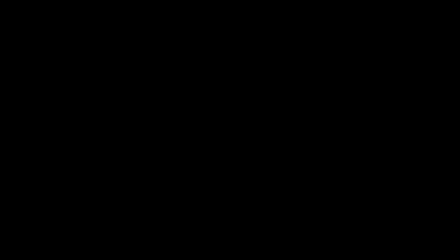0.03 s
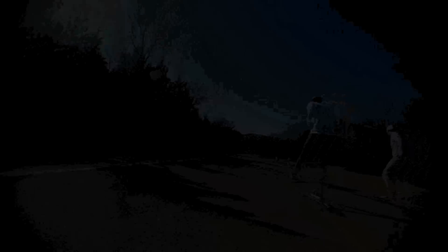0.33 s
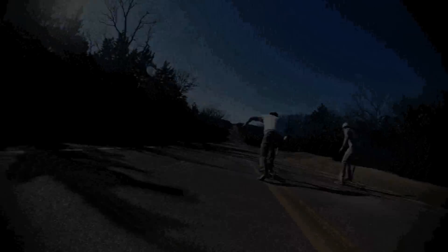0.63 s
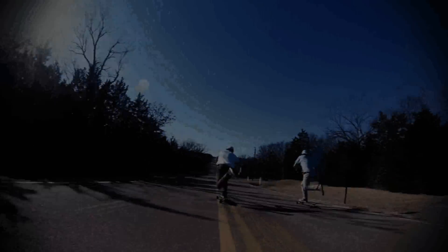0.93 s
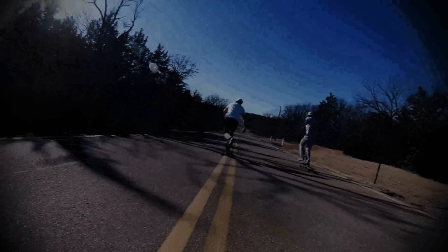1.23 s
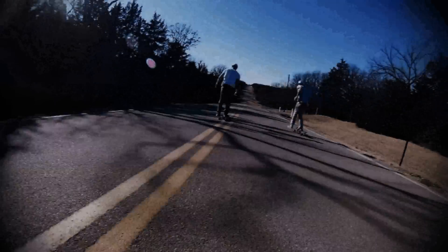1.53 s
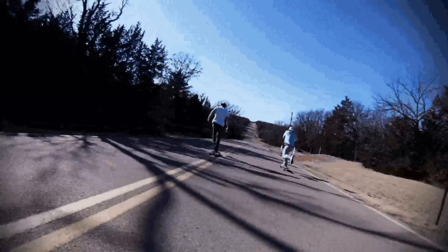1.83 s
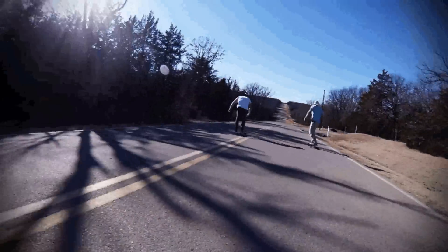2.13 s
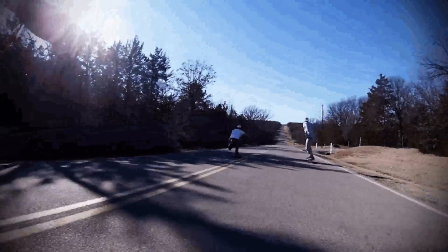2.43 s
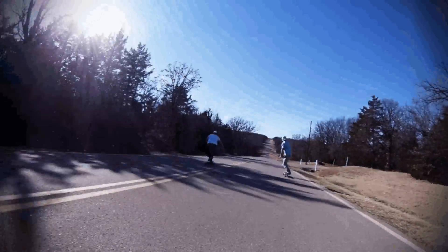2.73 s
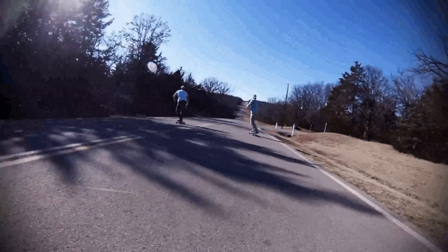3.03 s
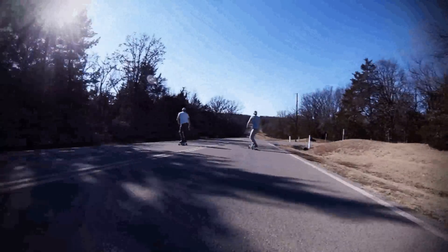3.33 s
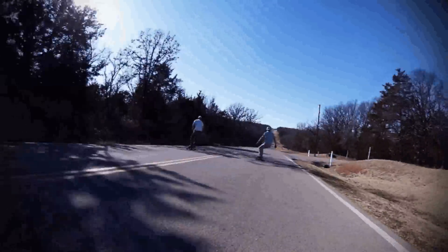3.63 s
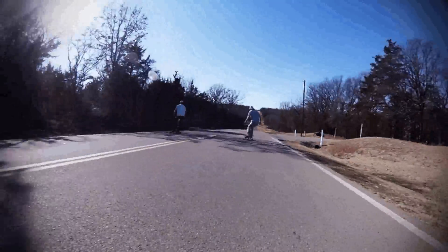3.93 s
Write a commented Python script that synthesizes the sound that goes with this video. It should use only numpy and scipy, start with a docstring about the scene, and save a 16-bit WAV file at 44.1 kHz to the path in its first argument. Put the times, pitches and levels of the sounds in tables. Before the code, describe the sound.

Longboard wheels fade in, roaring on coarse asphalt, humming and scraping in the turns. Wind increasingly buffets the microphone, which rides along in a plastic case, and a few bumps make the case knock, one very hard.

```python
"""An asphalt road, from a rolling longboard; the microphone rides along in a closed plastic camera case.
The sound fades in. The wheels roar on the coarse surface, and hum, whine and scrape in the carves.
Right at the microphone, air rushes over the case and buffets it more and more. Grit sizzles briefly.
A few bumps make the case knock; the hardest overloads the microphone."""
import sys
import numpy as np
from scipy import signal
from scipy.fft import rfft, irfft
from scipy.io import wavfile

SR = 44100
rng = np.random.default_rng(int(sys.argv[2]) if len(sys.argv) > 2 else 0)


def digitize_waveform(pressure):
    """Quantize a signal to 16-bit integers and store it at the path in sys.argv[1].

    Rows of a 2-D input are taken as channels; values are limited to [-1, 1].
    """
    field = np.atleast_2d(pressure).T
    bounded = np.clip(field, -1, 1)
    quanta = np.round(bounded * 32767).astype(np.int16)
    wavfile.write(sys.argv[1], SR, quanta)


N = 176400


def from_db(db):
    """Decibels to gain."""
    return 10 ** (np.asarray(db) / 20)


def rms_one(x):
    """Scale to rms 1."""
    return x / np.sqrt(np.mean(x ** 2) + 1e-20)


def in_time(rows):
    """Each column of a curve over time, at every sample."""
    times, *columns = np.transpose(rows)
    return [np.interp(np.arange(N) / SR, times, column) for column in columns]


def drift(rate_hz):
    """A random wander of rms about 1, mostly slower than rate_hz."""
    hop, settle = 40, 2000
    pole = np.exp(-2 * np.pi * rate_hz * hop / SR)
    noise = rng.standard_normal(N // hop + settle + 2)
    slow = signal.lfilter([1], [1, -2 * pole, pole * pole], noise)[settle:]
    return np.interp(np.arange(N) / hop, np.arange(len(slow)), rms_one(slow))


def coloured(x, colour):
    """Give a steady sound a spectrum that falls 12 dB an octave beyond its ends; rms 1."""
    hz, db = np.transpose(colour)
    f = np.maximum(np.arange(N // 2 + 1) * SR / N, 1)
    gain = from_db(np.interp(np.log(f), np.log(hz), db))
    skirts = np.minimum(f / hz[0], 1) ** 2 * np.minimum(hz[-1] / f, 1) ** 2
    return rms_one(irfft(rfft(x) * gain * skirts, N))


def ring(x, hz, t60):
    """One mode: a unit click rings with height 1."""
    r, w = from_db(-60 / (t60 * SR)), 2 * np.pi * hz / SR
    return signal.lfilter([0, np.sin(w)], [1, -2 * r * np.cos(w), r * r], x + 1e-18)


def grains(per_s, spread_db):
    """Random tiny impacts of uneven size."""
    hits = rng.random(N) < per_s / SR
    return hits * rng.standard_normal(N) * from_db(spread_db * rng.standard_normal(N))


def turbulence(flutter_hz, depth_db):
    """Noise whose strength flutters."""
    return rng.standard_normal(N) * from_db(depth_db * drift(flutter_hz))


def resonant_noise(hz, width_hz):
    """Noise passed twice through one resonance for steep skirts; rms 1."""
    band = signal.butter(1, [hz - width_hz / 2, hz + width_hz / 2], "band", fs=SR, output="sos")
    return rms_one(signal.sosfilt(band, signal.sosfilt(band, rng.standard_normal(N))))


def wheels():
    """Impacts on the asphalt's stones merge into a juddering roar; carving wheels hum and whine."""
    # roar, hum of the bite in a carve, and thin whine: (time [s], level [dB])
    roar_levels = [(0, -110), (.035, -93), (.078, -62), (.11, -61), (.3, -46), (.52, -42.5), (.77, -33.5),
                   (1.0, -32.5), (1.3, -34), (1.45, -30), (1.54, -27), (1.64, -24.5), (1.9, -27.5),
                   (2.2, -28.5), (2.38, -28.5), (2.55, -28), (2.95, -34), (3.15, -37), (3.35, -24.5),
                   (3.55, -33), (3.82, -35), (4, -27.5)]
    carve_levels = [(0, -110), (.3, -66), (.75, -37.5), (1.3, -55), (1.58, -24), (1.85, -34), (2.1, -36),
                    (2.36, -27.5), (2.46, -41), (3, -46), (4, -40.5)]
    whine_levels = [(0, -120), (.3, -79), (.6, -77), (.72, -66), (1.1, -74), (1.22, -61.5), (1.55, -59),
                    (1.9, -65), (2.35, -60), (2.6, -62), (2.8, -74), (4, -74)]
    # spectra of roar and whine: (frequency [Hz], relative level [dB])
    roar_colour = [(60, -47), (100, -11), (145, 0.5), (200, -3.5), (290, -2.5), (400, -3), (560, -2),
                   (810, -0.5), (950, -8.5), (1130, -11.5), (1290, -23), (1500, -17), (1800, -24.5),
                   (2150, -29), (4000, -38.5)]
    whine_colour = [(6700, -15), (7100, -5), (7400, 0), (7750, -13), (8400, -11), (9500, -23)]
    # wheel resonances: (frequency [Hz], width [Hz], relative level [dB])
    wheel_modes = [(406, 138, -1), (640, 166, -6.5), (795, 65, -9.5)]
    roar_db, = in_time(roar_levels)
    carve_db, = in_time(carve_levels)
    whine_db, = in_time(whine_levels)
    contact = grains(per_s=5000, spread_db=1.0) * from_db(1.06 * drift(rate_hz=31))
    roar = from_db(-.5) * coloured(contact, roar_colour)
    hum = rms_one(sum(from_db(db) * resonant_noise(hz, width) for hz, width, db in wheel_modes))
    whine = coloured(turbulence(flutter_hz=30, depth_db=3.5), whine_colour)
    return from_db(roar_db) * roar + from_db(carve_db) * hum + from_db(whine_db) * whine


def air():
    """Air rushes over the case, close around the microphone, and hums in its hollow in stronger gusts."""
    # rush of air: (time [s], level [dB], treble relative to it [dB])
    rush_levels = [(0, -100, -5), (.07, -82.5, -3), (.27, -66, -5), (.5, -60, -10.5), (.66, -48.5, -15.5),
                   (.8, -43, -14.5), (1.0, -46, -11.5), (1.33, -44, -15.5), (1.5, -41.5, -9.5),
                   (1.62, -37.5, -9), (1.72, -39, -10), (2.0, -41.5, -10.5), (2.3, -37.5, -11.5),
                   (2.45, -37, -9), (2.7, -36, -13), (3.0, -34.5, -13), (3.13, -31.5, -10.5),
                   (3.3, -30, -9.5), (3.5, -34.5, -9.5), (3.78, -34, -11.5), (3.95, -30.5, -9),
                   (4, -29.5, -8)]
    # hum in the hollow: (time [s], level [dB])
    hollow_levels = [(0, -100), (.7, -44), (2.0, -60), (2.35, -33), (2.6, -36.5), (3.0, -37), (3.25, -26),
                     (3.5, -40.5), (3.78, -34), (3.91, -28.5), (4, -25.5)]
    # spectra of the rush and its treble inside the case: (frequency [Hz], relative level [dB])
    rush_colour = [(300, -8), (600, -0.5), (1050, 4.5), (1350, -5.5), (1850, -5), (2050, -24.5),
                   (2250, -15.5), (2650, -2.5), (3050, 3.5), (3550, -5.5), (4200, -5.5), (4800, -16),
                   (5500, -32)]
    treble_colour = [(3500, -9), (4750, -27), (5050, 0.5), (5600, 0), (6200, 1), (6850, -13.5),
                     (7400, -11.5), (8200, -12.5), (9400, -14.5), (11000, -21), (12000, -42)]
    rush_db, treble_db = in_time(rush_levels)
    hollow_db, = in_time(hollow_levels)
    wavering = from_db(rush_db + drift(rate_hz=10.5))
    rush = from_db(1.15) * coloured(turbulence(flutter_hz=152, depth_db=1.0), rush_colour)
    treble = from_db(treble_db - .84) * coloured(turbulence(flutter_hz=150, depth_db=1.0), treble_colour)
    hum = resonant_noise(hz=556, width_hz=111)
    return wavering * (rush + treble) + from_db(hollow_db) * hum


def buffeting():
    """Eddies push on the case as a lumpy rumble."""
    # wind on the case: (time [s], level [dB])
    buffet_levels = [(0, -92), (.1, -68), (.6, -59), (.85, -48), (1.3, -46), (1.6, -39.5), (2.02, -38.5),
                     (2.1, -26.5), (2.17, -45), (2.5, -31.5), (2.95, -34), (3.12, -25.5), (3.42, -29),
                     (3.56, -29), (4, -34)]
    # spectrum of the rumble: (frequency [Hz], relative level [dB])
    buffet_colour = [(12, 7), (25, 2.5), (42, 2), (75, -3.5), (110, -5.5), (180, -16.5), (300, -14),
                     (450, -17), (1000, -62)]
    level_db, = in_time(buffet_levels)
    return from_db(level_db + 2.66) * coloured(turbulence(flutter_hz=17, depth_db=-3.0), buffet_colour)


def case_ring(jolt, thud_db, pitch):
    """Jolted, the plastic case rings briefly around the microphone."""
    # modes of the case at pitch factor 1: (frequency [Hz], relative level [dB], t60 [s])
    case_modes = [(187, -20, 0.018), (520, -17, 0.021), (925, -7, 0.011), (1920, -36, 0.007),
                  (2784, -6.5, 0.015), (2930, -4, 0.0083), (4330, -9, 0.0067), (5300, -16.5, 0.012),
                  (7700, -25, 0.0053)]
    thud_below_hz, dead_hz, contact_hz = 1200, 2300, 4970
    ringing = np.zeros(len(jolt))
    for hz, db, t60 in case_modes:
        ringing += from_db(db + thud_db * (hz < thud_below_hz)) * ring(jolt, hz * pitch, t60)
    dead_band = signal.iirnotch(dead_hz, Q=4, fs=SR)  # the case passes little here
    soft_wheels = signal.butter(2, contact_hz, fs=SR, output="sos")  # they dull each bump
    return signal.sosfilt(soft_wheels, signal.lfilter(*dead_band, ringing))


def knocks():
    """Each bump in the road jolts the case."""
    # bumps: (time [s], strength [dB], low thud relative to it [dB], pitch [factor])
    road_bumps = [(.078, -63, 23.5, 0.82), (1.3675, -25.5, -4, 0.81), (1.5233, -18, -7, 1),
                  (1.630, -25, 15, 0.93), (2.2236, -25, 8, 1), (2.3326, -8.5, 0, 1.04),
                  (2.405, -0.5, 6.5, 0.882), (2.406, 4.5, -18, 0.92), (3.1608, -7.5, 4, 1.01),
                  (3.959, -3.5, 3, 1.06)]
    jolt = signal.unit_impulse(SR // 10)
    out = np.zeros(N)
    for time, db, thud_db, pitch in road_bumps:
        start = int(time * SR)
        knock = from_db(db) * case_ring(jolt, thud_db, pitch)[:N - start]
        out[start:start + len(knock)] += knock
    return out


def sizzles():
    """Tiny impacts crowd into short patches of fine, bright grit."""
    # gritty patches: (start [s], length [s], level [dB])
    grit_patches = [(0.647, 0.13, -58), (0.757, 0.011, -54), (0.87, 0.13, -60.5), (1.195, 0.044, -55),
                    (1.376, 0.026, -54.5), (2.308, .1, -48.5)]
    # spectrum of the grit: (frequency [Hz], relative level [dB])
    grit_colour = [(3500, -22), (5500, -7), (6300, 11.5), (6900, -8), (7400, -6), (8500, -1), (11000, -8),
                   (12000, -24)]
    t = np.arange(N) / SR
    level = np.zeros(N)
    for start, length, db in grit_patches:
        progress = np.clip((t - start) / length, 0, 1)
        level += from_db(db) * np.sqrt(np.abs(np.sin(np.pi * progress)))
    return level * coloured(grains(per_s=2800, spread_db=5), grit_colour)


def scrapes():
    """The wheels bite sideways: a rough, bright rub that swells and dies."""
    # sideways bites: (middle [s], spread [s], level [dB])
    wheel_bites = [(1.51, 0.07, -39.5), (2.27, 0.086, -38.5)]
    t = np.arange(N) / SR
    level = sum(from_db(db) * np.exp(-.5 * ((t - mid) / spread) ** 2) for mid, spread, db in wheel_bites)
    roughness = from_db(1.7 * drift(rate_hz=60))
    return level * roughness * resonant_noise(hz=2960, width_hz=500)


def scene():
    """Everything meets at the one microphone riding in the case."""
    return (wheels() + scrapes() + air() + buffeting() + knocks() + sizzles())[None]


def record(dry):
    """The microphone overloads and flattens the hardest peaks; the top of the treble is cut."""
    ceiling, cutoff_hz = 0.7, 12400
    flattened = dry / (1 + (dry / ceiling) ** 6) ** (1 / 6)
    return signal.sosfilt(signal.cheby2(16, 60, cutoff_hz, fs=SR, output="sos"), flattened)


dry = scene()
out = record(dry)
digitize_waveform(out)
```